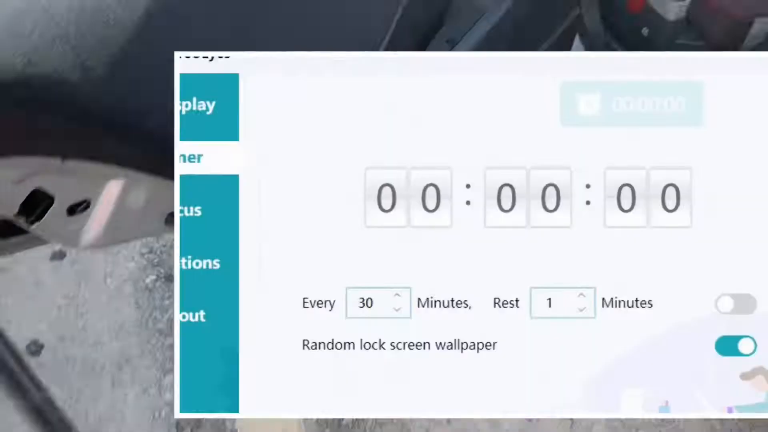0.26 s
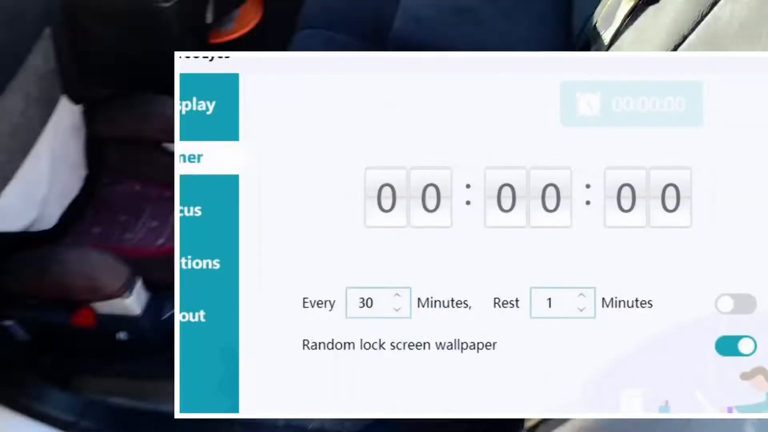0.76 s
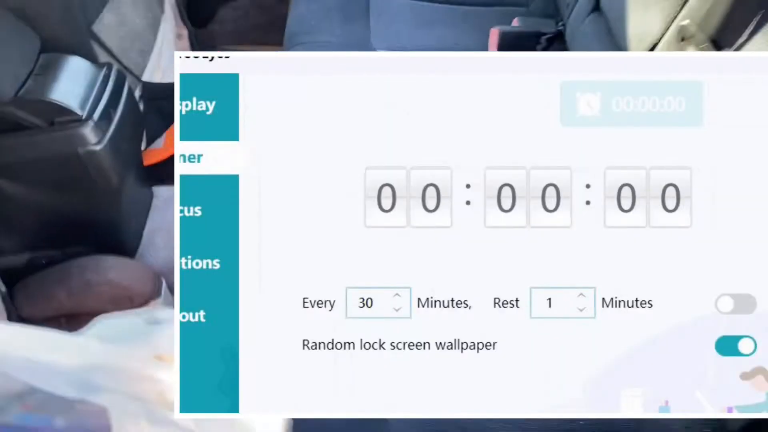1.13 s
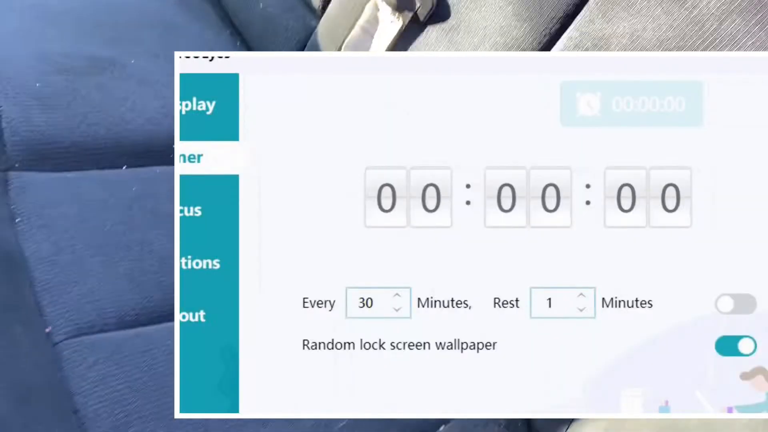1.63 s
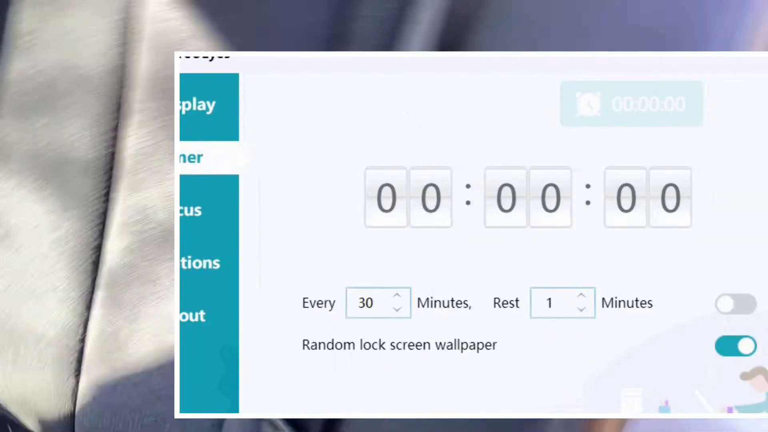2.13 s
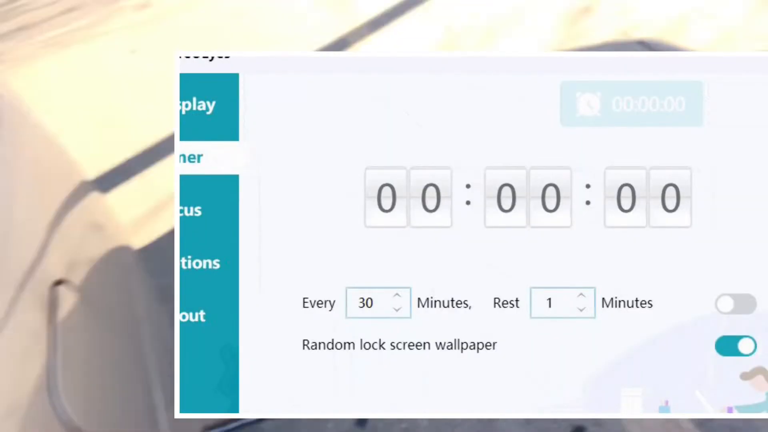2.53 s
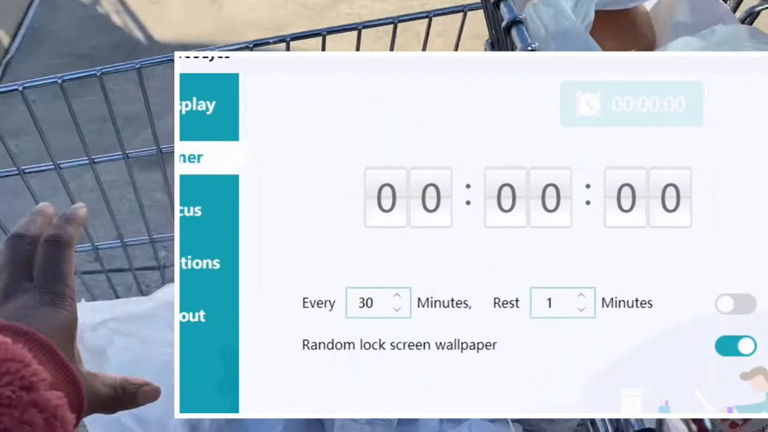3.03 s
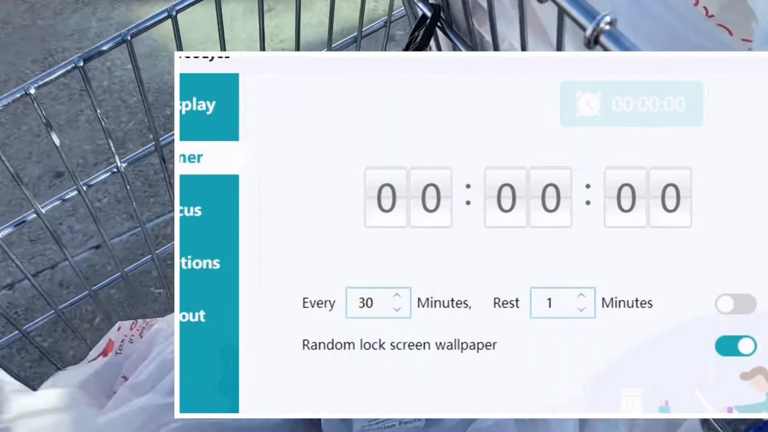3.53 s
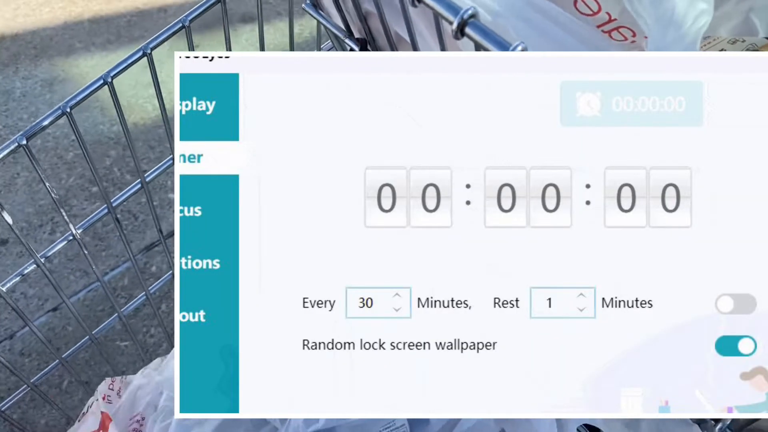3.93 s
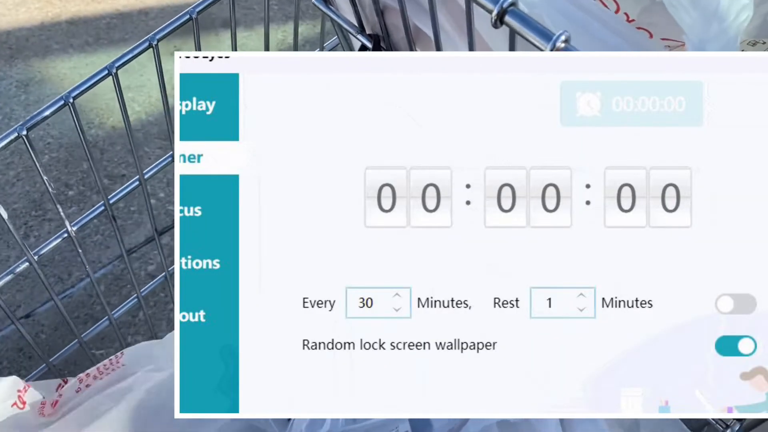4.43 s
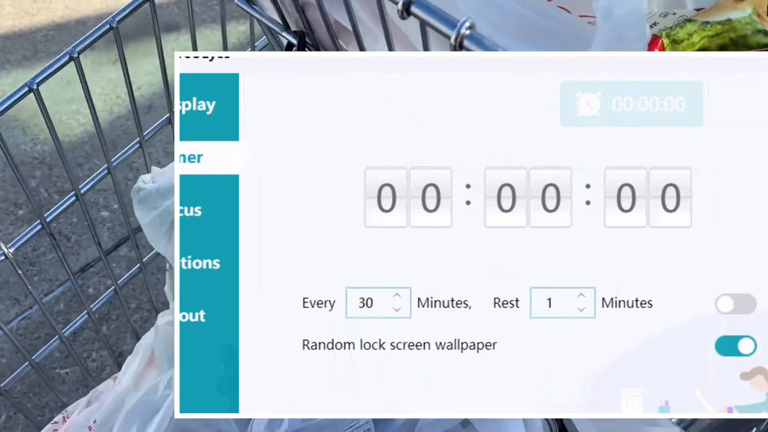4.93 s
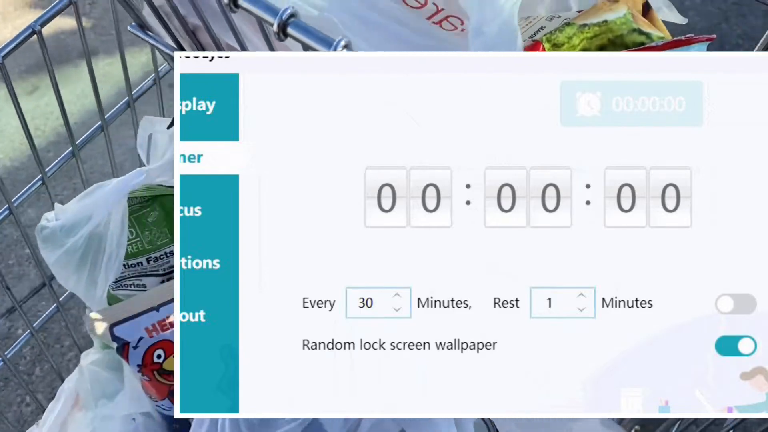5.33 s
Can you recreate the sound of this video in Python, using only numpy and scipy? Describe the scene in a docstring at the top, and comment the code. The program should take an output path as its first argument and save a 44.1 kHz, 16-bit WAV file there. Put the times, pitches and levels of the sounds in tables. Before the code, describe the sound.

A loaded wire cart rolls over rough concrete outdoors, close to a hand-held phone in stereo. Throughout, the wheels give a low, fluttering hum that creeps slightly upward in pitch, with lumpy rumble and soft gritty hiss. From 0 to 2.1 s plastic bags rustle in short swells, with bright snaps near 0.6, 1.0 and 1.3 s and a dense cluster around 1.5 s; brief dull wire rings come near 0.4 and 1.2 s. From 2.1 to 2.9 s the bags pause: rumble swells, thuds land at about 2.15, 2.35 and 2.45 s, and a very faint high whine fades. A thinner drone enters near 2.5 s. After 2.9 s rustling returns, sharpest near 3.45 s and strong again around 4.0 to 4.2 s, with low bumps, wind buffeting and a weakening hum. Crinkling grows toward the end at 5.6 s, with another thud near 5.5 s.

```python
"""A loaded wire cart rolls over concrete close to a hand-held phone with two microphone ports. The wheels hum at a
slowly rising pitch, made of sine partials, and rumble and hiss as shaped noise; a thinner drone, thuds and a basket
resonance come with them. Thin plastic bags rustle in swells of crackling noise and pause for a moment. Wires and
bags crack as short noise bursts, wires ring as decaying sines, a faint whine passes, and low noise is the wind."""
import sys
import numpy as np
from scipy import signal
from scipy.fft import rfft, irfft
from scipy.io import wavfile
from scipy.ndimage import uniform_filter1d

SR = 44100
rng = np.random.default_rng(int(sys.argv[2]) if len(sys.argv) > 2 else 0)


def invert_db(level):
    """Linear amplitude ratio for a level in decibels (20 dB per decade), elementwise."""
    return 10 ** (np.asarray(level, dtype=float) / 20)


def dump(signal):
    """Clip the signal to [-1, 1] and save it as 16-bit WAV at the path in sys.argv[1]."""
    limited = np.clip(np.atleast_2d(signal).T, -1, 1)
    pcm = np.round(limited * 32767).astype(np.int16)
    wavfile.write(sys.argv[1], SR, pcm)


N = 246078  # samples
T = np.arange(N) / SR  # seconds
FREQ = np.fft.rfftfreq(N, 1 / SR)  # Hz


def curves(table):
    """Columns of a table, drawn as straight lines through time."""
    s, *columns = np.transpose(table)
    return [np.interp(T, s, c) for c in columns]


def bumps(table):
    """Brief changes in dB, straight to the peak and straight back again."""
    return sum(db * np.maximum(1 - np.abs(T - s) / half_s, 0) for s, db, half_s in table)


def unit(x):
    """Scale to rms 1."""
    return x / np.sqrt(np.mean(x ** 2))


def walk(rate):
    """Random levels held 1 / rate s and slewed twice; spread near 1."""
    hold = int(SR / rate)
    steps = np.repeat(rng.standard_normal(N // hold + 1), hold)
    return 1.251 * uniform_filter1d(uniform_filter1d(steps, hold), hold)[:N]


def tone(hz, unsteady=0):
    """Sine that follows a pitch curve in Hz; unsteady is a factor on the pitch, less 1."""
    return np.sin(2 * np.pi * np.cumsum(hz * (1 + unsteady)) / SR)


def colour(x, spectrum):
    """Shape by (Hz, dB) points, joined over log frequency."""
    hz, db = np.transpose(spectrum)
    return irfft(rfft(x) * invert_db(np.interp(np.log(FREQ + 1), np.log(hz), db)), N)


def band(x, hz, width):
    """Resonance applied twice; width in Hz is that of one pass."""
    gain = 1 / (1 + 1j * (FREQ ** 2 - hz ** 2) / (FREQ * width + 1e-9))
    return irfft(rfft(x) * gain ** 2, N)


def twins():
    """Two unrelated noises."""
    return rng.standard_normal((2, N))


def add(out, s, burst):
    """Place a burst at s seconds."""
    i = int(s * SR)
    out[:, i:i + burst.shape[1]] += burst[:, :N - i]


def blows(table):
    """Each blow is a sharp push with a dying scatter of noise behind it, heard through its own band."""
    out, t = np.zeros((2, N)), np.arange(int(.15 * SR)) / SR
    for s, peak_db, hz, octaves, t60 in table:
        edges = np.clip(hz * 2 ** (np.array([-.5, .5]) * octaves), 40, 19000)
        push = rng.standard_normal((2, len(t))) * np.exp(-np.log(1000) * t / t60)
        push[:, 0] = 4.3  # the sharp push
        burst = signal.sosfilt(signal.butter(3, edges, "band", fs=SR, output="sos"), push)
        add(out, s, invert_db(peak_db) * burst / np.abs(burst).max(axis=1, keepdims=True))
    return out


# Wheel hum. Each row: time in seconds, pitch in Hz, second partial in dB rms, third partial in dB rms.
WHEEL_HUM = [(0, 113.7, -37, -48), (.3, 115.3, -51, -45), (.6, 117.9, -64, -74), (.9, 119.8, -47, -58),
             (1.1, 121.2, -43, -48.5), (1.3, 122.6, -32.5, -43.5), (1.5, 124.1, -33, -39),
             (1.7, 125.2, -35.5, -46.5), (1.9, 126.3, -40, -47), (2.1, 127.5, -32.5, -53.5),
             (2.3, 128.4, -49, -59), (2.7, 129.3, -47.5, -56.5), (3.2, 131.9, -42, -52),
             (3.8, 134.5, -60, -56), (4.4, 136, -48, -62), (5, 139.1, -56, -62.5), (5.58, 140.3, -47, -56)]
# Lowest partial, strongest while the wheels are pressed down. Each row: time in seconds, level in dB rms.
HUM_LEVEL = [(0, -23.5), (.23, -31), (.264, -16), (.36, -28.5), (.48, -22), (.634, -29), (.67, -21),
             (.88, -18.5), (1.1, -21), (1.5, -21.5), (1.57, -18.5), (2.7, -18.5), (2.99, -25), (3.3, -32),
             (3.5, -27), (3.87, -22), (4.17, -33), (4.53, -26.5), (4.6, -23), (4.84, -50), (5.08, -34),
             (5.58, -34.5)]
# Brief dips in the level of the lowest partial; the late ones, where the hum is weak, are chance flicker.
# Each row: time in seconds, change in dB, half length in seconds.
HUM_DIPS = [(.068, -7, .045), (.152, -8, 0.027), (.418, -19, 0.043), (1.624, -10.5, 0.045),
            (1.708, -3.5, 0.026), (1.82, -6.5, 0.076), (1.868, -15.5, 0.042), (2.34, -12.5, .033),
            (2.762, -10.5, 0.065), (2.96, -19, .045), (3.142, -13, 0.017), (3.258, -20.5, 0.021),
            (3.374, -12, 0.018), (3.568, -24, 0.035), (3.64, -30, 0.044), (3.72, -5.5, 0.047),
            (3.804, -23, 0.028), (3.97, -18, .06), (4.096, -3, 0.13), (4.558, -22, 0.035),
            (5.17, -12, 0.098), (5.35, -18, 0.045), (5.455, -13, 0.051)]


def wheel_hum():
    """The turning wheels sound three harmonic partials on one slightly unsteady pitch."""
    hz, *upper_db = curves(WHEEL_HUM)
    unsteady = 0.0039 * walk(25.22)
    lowest_db = curves(HUM_LEVEL)[0] + bumps(HUM_DIPS) + 0.88 * walk(14)
    hum = invert_db(lowest_db) * tone(hz, unsteady)
    for partial, db in enumerate(upper_db, 2):
        hum = hum + invert_db(db + 2.0 * walk(12.05)) * tone(partial * hz, unsteady)
    return np.sqrt(2) * hum


# Thinner drone of the frame. Each row: time in seconds, pitch in Hz, level in dB rms.
FRAME_DRONE = [(2.45, 208, -64), (2.58, 209.4, -38), (2.77, 211.2, -33.5), (2.9, 213, -35.5),
               (3.3, 215.9, -31), (3.7, 219.1, -29), (3.9, 219.6, -33.5), (4.23, 221, -27.5),
               (4.5, 222.9, -31.5), (4.9, 225.2, -33.5), (5.1, 226.5, -36), (5.3, 226, -50),
               (5.58, 228.5, -74)]
# Brief dips in the drone's level. Each row: time in seconds, change in dB, half length in seconds.
DRONE_DIPS = [(2.85, -11, 0.043), (3.02, -17, 0.034), (3.12, -16, 0.033), (3.19, -6, 0.073),
              (3.37, -2, 0.027), (3.5, -12, 0.058), (3.82, -29, 0.061), (4.3, -11, 0.056),
              (4.44, -8, 0.078), (4.82, -21, 0.027), (5.19, -11, .03)]


def frame_drone():
    """The frame sounds one sine at its own slightly unsteady pitch."""
    hz, db = curves(FRAME_DRONE)
    return np.sqrt(2) * invert_db(db + bumps(DRONE_DIPS)) * tone(hz, 0.0021 * walk(22))


# The load on the wheels. Each row: time in seconds, rumble in dB, rolling hiss in dB.
ROLL = [(0, -27, -37), (.35, -26.5, -37.5), (.8, -28, -40), (1.2, -26, -40.5), (1.45, -28, -40),
        (1.57, -26.5, -34), (1.65, -29.5, -37.5), (2.06, -26.5, -38.5), (2.15, -21.5, -37),
        (2.65, -22, -35), (2.8, -27.5, -36), (3.2, -26, -36.5), (3.8, -27, -35), (4.25, -27, -36.5),
        (4.9, -27, -34), (5.4, -27, -36), (5.5, -27.5, -34.5), (5.58, -28, -35)]
# The rumble lurches up on rough patches and sags on smooth ones.
# Each row: time in seconds, change in dB, half length in seconds.
LURCHES = [(.03, -6, 0.025), (.2, -4.5, 0.072), (.26, 3.5, 0.039), (1.6, -3, .05), (2.14, 2, 0.036),
           (2.44, -3.5, 0.036), (2.47, 11.5, 0.033), (2.5, -9, 0.038), (2.92, -6, 0.053),
           (3.17, 3.5, 0.044), (3.33, 5, 0.071), (3.365, -8.5, .05), (3.46, 4, 0.048), (3.54, -4.5, 0.068),
           (3.68, 7, .05), (3.75, -5, 0.0764), (4.04, 8, .06), (4.09, -8, 0.0402), (4.2, 5.5, 0.045),
           (4.49, 3.5, 0.063), (4.83, -3.5, 0.095), (4.88, 0.5, 0.034), (4.93, -4, 0.045), (5.36, 5, .04)]
# Colour of the rumble. Each row: frequency in Hz, relative level in dB.
RUMBLE = [(12, -59), (25, -27), (45, -7), (75, 0.5), (98, -0.5), (125, -1), (155, -7.5), (178, -10.5),
          (239, -9.5), (300, -20.5), (390, -35.5), (660, -86)]
# Colour laid over the grit. Each row: frequency in Hz, relative level in dB.
HISS = [(100, -33), (200, -15), (350, -1.5), (600, -4), (850, -6), (1200, -9), (2500, -19.5), (4000, -34),
        (8000, -47.5), (16000, -38.5)]


def rolling():
    """Coarse concrete shakes the wheels in lumps; finer grit hisses, each narrow band wavering alone."""
    rumble_db, hiss_db = curves(ROLL)
    rumble = invert_db(rumble_db + bumps(LURCHES) + 1.1 * walk(13)) * unit(colour(twins(), RUMBLE))
    grit = np.zeros((2, N))
    for hz in 150 * 2 ** np.arange(0, 6, 1 / 4):  # four bands an octave
        grit += invert_db(2.43 * walk(9)) * band(twins(), hz, .25 * hz) / np.sqrt(hz)
    return rumble + invert_db(hiss_db) * unit(colour(unit(grit) + 0.24 * twins(), HISS))


# Dull thuds of the wheels on joints.
# Each row: start in seconds, peak in dB, centre in Hz, width in octaves, decay by 60 dB in seconds.
THUDS = [(.26, -23, 105, 0.75, 0.13), (1.56, -23.5, 427, 1.4, 0.074), (2.152, -15.5, 170, 1.8, 0.081),
         (2.34, -11, 90, 0.86, 0.19), (2.458, -16, 190, 2.3, 0.065), (3.165, -15.5, 89.6, 1.42, .06),
         (3.47, -25, 423, 0.95, 0.28), (3.672, -16.5, 110.7, 1.3, 0.0498),
         (4.022, -21.5, 111.1, 1.95, 0.026), (4.195, -18, 84.9, 1.2, 0.076), (4.597, -15, 118, 1.05, 0.048),
         (4.87, -13.5, 69.5, 1.9, 0.067), (5.478, -18.5, 290, 1.1, 0.11)]


def thuds():
    """A wheel strikes a joint: a low, band-limited blow."""
    return blows(THUDS)


# Basket resonance, close by. Each row: time in seconds, centre in Hz, level in dB rms.
BASKET = [(0, 564, -44), (.4, 852, -46), (1.2, 881, -55.5), (1.8, 829, -49.5), (2.3, 827, -40.5),
          (2.8, 776, -58.5), (3.2, 560.5, -44), (3.8, 617.6, -47), (4.4, 659.5, -42.5), (5, 669, -46),
          (5.58, 656, -52)]


def basket():
    """The shaking excites a broad basket resonance that shifts with the load: slow noise carried on its centre."""
    hz, db = curves(BASKET)
    shake = unit(signal.sosfilt(signal.butter(2, 70, fs=SR, output="sos"), twins()))
    return invert_db(db) * np.sqrt(2) * shake * tone(hz)


# Start and end of the pause between rustles, in seconds.
STILL_S = 2.13, 2.937
# Bags at rest. Each row: time in seconds, rustle in dB, fold body in dB over it, thin film in dB over it;
# all before the band trims.
BAGS = [(0, -57, 2, -5), (2.12, -55.5, -4.5, -4.5), (2.14, -58, 1, -5.5), (2.19, -64, -7, -19.5),
        (2.4, -67, 9, -9.5), (2.66, -78.5, 15.5, -17.5), (2.93, -63.5, -2, -9.5), (2.94, -52.5, 1.5, -4.5),
        (5.58, -52.5, -3.5, -3)]
# Each shift of the bags. Each row: peak time in seconds, peak in dB before the band trims, seconds to swell 10 dB,
# seconds to fade 10 dB (anything shorter than .025 plays as .025), fold body in dB over the peak.
RUSTLES = [(.01, -44.5, -0.5, .06, 2.5), (0.079, -40.5, 0.1, 0.07, -0.5), (.28, -50, 0.2, 0.17, -3),
           (.385, -48, 0, 0.16, -2.5), (.57, -45.5, 0.2, -0.08, 2.5), (.64, -44.5, 0.1, -0.2, -6),
           (0.801, -47, .2, 0.2, -6), (0.907, -41, -0.07, 0.05, -5.5), (1.03, -42, 0.01, 0.09, -6.5),
           (1.292, -44, 0.05, .05, -3), (1.41, -47.5, .05, 0.3, -7.5), (1.47, -48, 0.09, .05, -10),
           (1.525, -41, -0.01, 0.07, 3.5), (1.565, -38.5, 0.01, 0.05, 1.5), (1.66, -46.5, .05, 0.14, -1),
           (1.761, -38, 0.08, 0.06, -3.5), (1.91, -51, 0.45, 0, -9), (2.07, -49.5, .15, 0.3, -3.5),
           (2.99, -46.5, 0.3, 0.8, -10), (3.16, -36.5, 0, 0.04, -6.5), (3.261, -42.5, -0.08, 0.15, -5.5),
           (3.457, -28.5, 0.05, 0.0456, -9), (3.652, -40.5, 0.02, 0.04, -7), (3.74, -41.5, .04, 0, -8),
           (3.86, -44.5, 0.07, 0.14, -4), (3.926, -41.5, 0.09, 0.09, -7), (3.971, -34.5, 0.085, 0.09, -8.5),
           (4.118, -32.5, 0.04, 0.08, -6), (4.18, -37, 0.06, 0.03, -7.5), (4.27, -43.5, 0.1, .1, -2),
           (4.39, -40, 0.08, 0.08, -11), (4.589, -42, 0.03, 0.06, -7.5), (4.75, -41.5, 0.04, .05, -7),
           (4.67, -48, 0.14, 0.1, -4), (4.9, -46, 0, 0, -9), (5.04, -47, 0.12, 0, -7),
           (5.17, -42.5, 0.11, 0, -4.5), (5.25, -45.5, -0.07, 0.5, -4), (5.38, -39.5, -0.07, 0.3, -2.5),
           (5.47, -37, 0.03, 0, -5.5), (5.57, -34, .1, -6.4, -4.5)]


def rustling():
    """Levels of fold body, crinkle and film: the resting bags plus every rustle, added in power."""
    rest_db, body_db, film_db = curves(BAGS)
    power = invert_db(rest_db + np.array([body_db, 0 * T, film_db])) ** 2
    moving = (T < STILL_S[0]) | (T > STILL_S[1])
    for s, peak_db, swell_s, fade_s, fold_db in RUSTLES:
        away = np.abs(T - s) / np.maximum(np.where(T < s, swell_s, fade_s), .025)
        swell_db = peak_db - 10 * away ** 1.35  # exponent 1 = pointed peak, 2 = rounded
        thin_db = -5.5 - 0.2 * fold_db  # heavy folds carry less thin film
        bands_db = np.array([[fold_db], [0], [thin_db]])
        power = power + moving * invert_db(swell_db) ** 2 * invert_db(bands_db) ** 2
    return np.sqrt(power)


# Fold body, crinkle and thin film. Each row: centre in Hz, width of one pass in Hz, trim in dB.
BAG_BANDS = [(2300, 3150, 0), (5190, 8900, -0.5), (12500, 16000, 9)]
# The bags after the pause, heard from another angle. Each row: frequency in Hz, change in dB.
BAGS_TURNED = [(900, 4), (1500, 2.5), (2200, -0.4), (2950, -2.5), (3400, 0), (3800, 1.5), (4500, .5),
               (5500, -.5), (6500, -0.34)]


def bags():
    """Dense tiny buckles of plastic film: noise whose level jumps with every crease, in three broad bands."""
    sizes = invert_db(3.0 * np.minimum(rng.exponential(size=N), 4))
    creases = (rng.random(N) < 900 / SR) * sizes  # about 900 a second
    crackle = signal.lfilter([1], [1, -np.exp(-1 / (0.0028 * SR))], creases)  # each dies over 2.8 ms
    grain = (1 + .5 * unit(crackle)) * invert_db(0.61 * walk(30))
    film = np.zeros((2, N))
    for (hz, width, trim_db), level in zip(BAG_BANDS, rustling()):
        film += level * invert_db(trim_db + 1.06 * walk(18)) * unit(band(grain * twins(), hz, width))
    return np.where(T < STILL_S[1], film, colour(film, BAGS_TURNED))


# Cracks of wire and film.
# Each row: start in seconds, peak in dB, centre in Hz, width in octaves, decay by 60 dB in seconds.
TICKS = [(.5984, -19.5, 4800, 0.68, 0.0089), (.5988, -24.5, 1880, 1.4, 0.024),
         (.641, -33, 2600, 0.75, 0.015), (.165, -29.5, 3480, 1.1, 0.019), (0.6396, -21, 4730, 1.1, 0.013),
         (0.64, -29, 11000, 0.59, .008), (.884, -31, 8030, 1.5, .02), (.385, -32, 6000, 0.96, .015),
         (.939, -33, 2460, 0.46, 0.017), (.942, -28, 5000, 1.4, 0.012), (1.0241, -16.5, 6997, 1.9, .015),
         (1.112, -38, 4500, 2.1, .008), (1.1193, -32.5, 3200, 1.4, .012), (1.1867, -35, 1590, 0.85, 0.027),
         (1.189, -34, 4200, 1.4, 0.0088), (1.293, -20, 6670, 1.7, 0.029), (1.3617, -18, 9200, 1.1, 0.012),
         (1.3627, -26.5, 3200, 1.2, 0.019), (1.508, -25.5, 2800, .7, 0.024),
         (1.5152, -17, 7320, .6, 0.0045), (1.5142, -32, 3000, 0.96, .01), (1.525, -22, 1800, 1.7, 0.0074),
         (1.535, -24, 3470, 0.46, 0.012), (1.546, -25, 3170, 0.72, 0.022), (1.562, -25, 2300, 0.54, 0.052),
         (1.553, -29, 3000, .9, .01), (1.569, -30.5, 3600, .9, .01), (1.581, -23, 3440, 0.66, 0.013),
         (2.1291, -32.5, 2440, 0.85, 0.045), (2.216, -37.5, 10510, 1, 0.019),
         (2.2726, -42.5, 12500, 0.72, .01), (2.285, -41, 12800, .8, .012),
         (2.3559, -44, 13400, 0.44, 0.0092), (2.3923, -43, 12500, .8, .02),
         (2.4645, -34.5, 11490, .9, .015), (2.519, -51, 13600, .5, 0.016), (2.5499, -52.5, 11140, .8, .015),
         (2.571, -48.5, 13960, .4, .01), (2.8395, -45.5, 9000, 1.2, 0.013), (2.8617, -47, 9000, 1.5, .015),
         (2.9399, -36.5, 6038, 2.1, .015), (3.5932, -36, 2403, 0.64, 0.013), (3.7259, -31, 4321, 1, 0.014)]


def ticks():
    """Wire or film snaps: a short, bright blow."""
    return blows(TICKS)


# Basket wires, felt through the hand.
# Each row: start in seconds, level in dB before the soft onset, pitch in Hz, decay by 60 dB in seconds.
RINGS = [(.42, -25.5, 834, 0.033), (1.186, -22, 725, .025), (1.203, -29, 800, 0.025),
         (1.534, -25.5, 990, .04), (2.864, -23, 796, .025), (3.79, -35, 1212, 0.046),
         (5.175, -30.5, 1003, 0.093), (5.181, -37, 1880, 0.13)]


def rings():
    """A soft push about one cycle long rings one wire as a dying sine."""
    out, t = np.zeros((2, N)), np.arange(int(.2 * SR)) / SR
    for s, level_db, hz, t60 in RINGS:
        ring = np.sin(2 * np.pi * (hz * t + rng.random((1, 1))))
        onset = (1 - np.exp(-t * hz)) ** 2
        add(out, s, invert_db(level_db) * ring * onset * np.exp(-np.log(1000) * t / t60))
    return out


# Faint whine. Each row: time in seconds, pitch in Hz, sine peak in dB.
WHINE = [(1.88, 6560, -85), (1.96, 6560, -66), (2.15, 6557, -67), (2.3, 6555, -72), (2.45, 6550, -78),
         (2.5, 6550, -95)]


def whine():
    """A thin tone from a caster bearing, wavering in pitch and level."""
    hz, db = curves(WHINE)
    return invert_db(db + 2.5 * walk(20)) * tone(hz, .001 * walk(15))


# Gusts and lulls at the ports. Each row: time in seconds, change in dB, half length in seconds.
GUSTS = [(.25, 6, 0.31), (.78, -17, 0.28), (1.26, 5, 0.1), (1.62, -9, .09), (2.45, 8.5, .35),
         (2.79, 9, 0.075), (2.97, 14.5, 0.076), (3.24, -13, .12), (3.7, 2, 0.26), (4.14, 10.5, .1),
         (4.37, 8, 0.15), (4.58, -19, .1), (4.69, 10, .1), (5.0, 10.5, .2)]


def wind():
    """Low buffeting, pushing the two ports mostly against each other."""
    across, along = unit(band(band(twins(), 106, 200), 110, 300))
    wind_db = -37.5 + bumps(GUSTS) + 2.0 * walk(11)
    return invert_db(wind_db) * (across * np.array([[1], [-1]]) + 0.6 * along)


# Stereo phase and likeness by frequency: a short lag between the ports at first; in the treble the two
# channels are heard in steps of equal or opposite phase.
# Each row: frequency in Hz, half turns by which left leads right, likeness from 0 to 1.
STEREO = [(1, 0, .97), (120, -.07, .97), (250, -.15, .8), (450, -.25, .5), (800, -.9, .4), (1500, -1.1, .1),
          (2200, -1.97, .45), (2900, -2.1, .4), (3300, -2, .8), (3550, -2, .99), (4150, -2, .99),
          (4700, -2.1, .55), (5700, -2, .3), (6200, -2, .7), (6400, -2, 1), (7500, -2, 1), (7650, -1.7, .7),
          (8300, -1.4, .7), (8500, -1, 1), (9550, -1, 1), (9700, -.7, .65), (10300, -.35, .65),
          (10450, 0, 1), (11600, 0, 1), (11750, .3, .7), (12500, .65, .7), (12750, 1, 1), (13700, 1, 1),
          (13850, 1.3, .65), (14450, 1.6, .65), (14600, 2, 1), (22050, 2, 1)]
# Balance of the channels. Each row: frequency in Hz, left minus right in dB.
TILT = [(60, -1.5), (130, -0.2), (300, -2), (600, 2.5), (900, 2), (2700, 4), (3600, 0), (5000, 5),
        (6400, 0.5)]


def stereo(shared, other):
    """The right channel is the left's sound turned in phase, mixed with its own share."""
    hz, half_turns, like = np.transpose(STEREO)
    like = np.clip(np.interp(FREQ, hz, like), 0, 1)
    turn = np.exp(-1j * np.pi * np.interp(FREQ, hz, half_turns))
    right = (like * rfft(shared) + np.sqrt(1 - like ** 2) * rfft(other)) * turn
    tilt = invert_db(np.interp(FREQ, *np.transpose(TILT)) / 2)
    return irfft(np.array([rfft(shared) * tilt, right / tilt]), N)


def opposed_band(other):
    """Until the pause ends, a band around 3.8 kHz is added to the channels with opposite sign."""
    early = (T < STILL_S[1]) * other
    return invert_db(-4) * band(early, 3800, 1300) * np.array([[1], [-1]])


def scene():
    """Cart and bags spread in stereo, wind straight on the ports; wires ring through the hand into both alike."""
    cart = rolling() + thuds() + basket() + bags() + ticks() + whine()
    hum = (wheel_hum() + frame_drone()) * np.array([[1], [.1]])  # nearly all of it shared
    return stereo(*(cart + hum)) + opposed_band(cart[1]) + rings() + wind()


def band_limit(x):
    """A steep low-pass at the top of the band."""
    return signal.sosfilt(signal.butter(12, 17050, fs=SR, output="sos"), x)


def record(dry):
    """The phone cuts the top steeply above 15.75 kHz."""
    cut = signal.sosfilt(signal.ellip(10, .2, 80, 15750, fs=SR, output="sos"), dry)
    return band_limit(cut)


dry = scene()
out = record(dry)
dump(out)
```